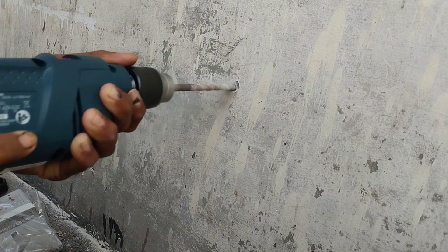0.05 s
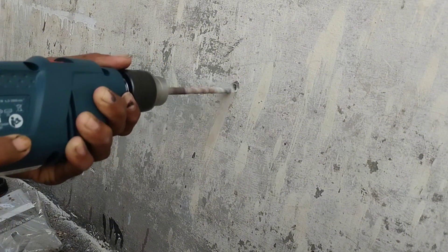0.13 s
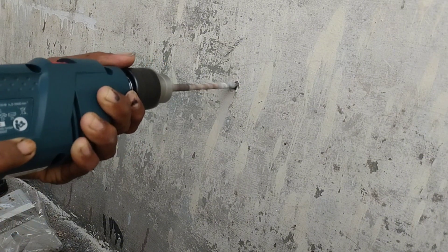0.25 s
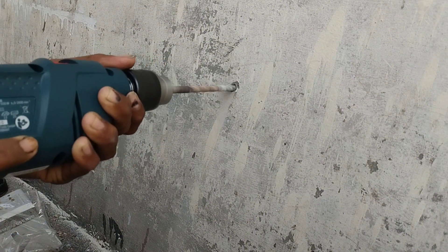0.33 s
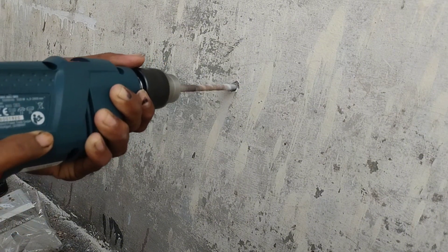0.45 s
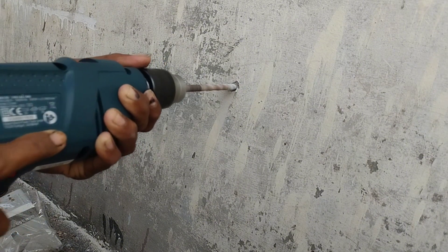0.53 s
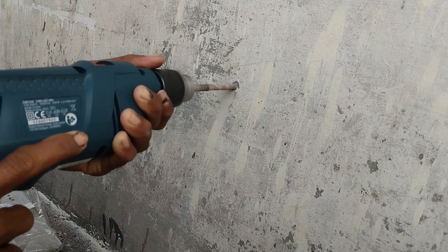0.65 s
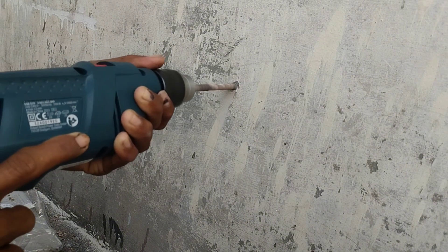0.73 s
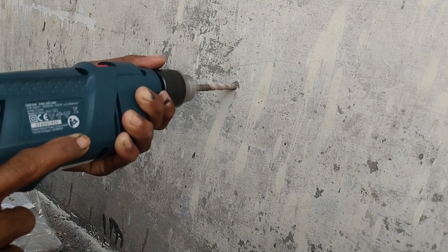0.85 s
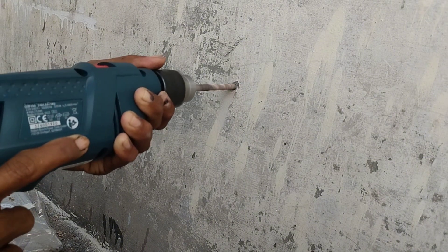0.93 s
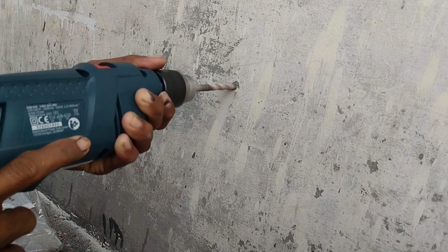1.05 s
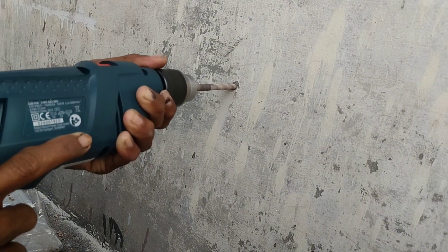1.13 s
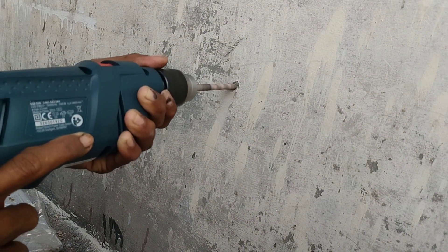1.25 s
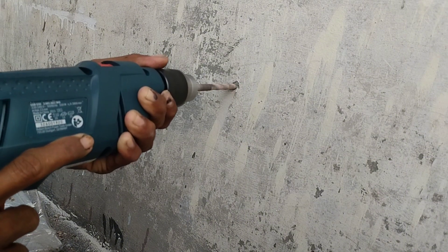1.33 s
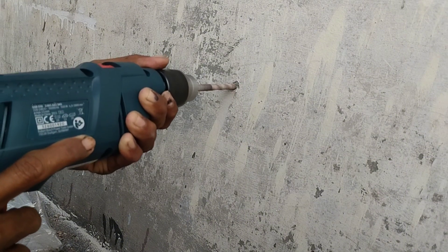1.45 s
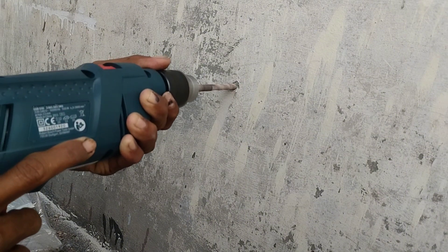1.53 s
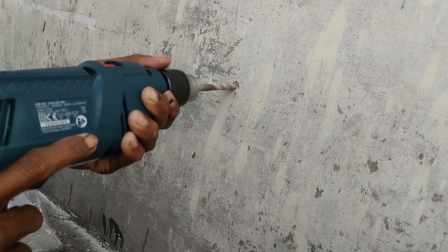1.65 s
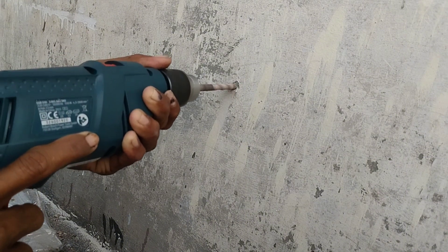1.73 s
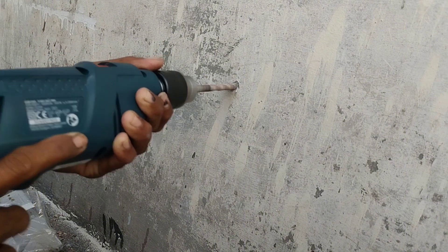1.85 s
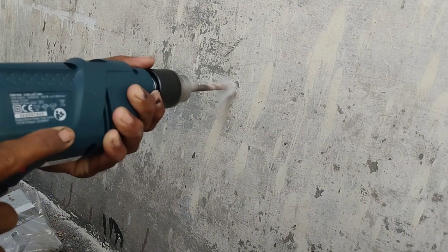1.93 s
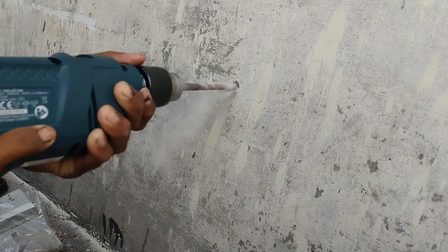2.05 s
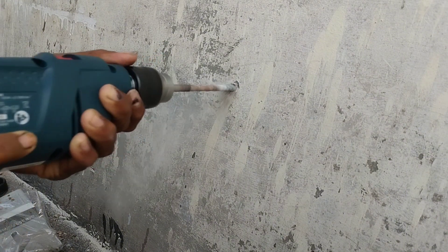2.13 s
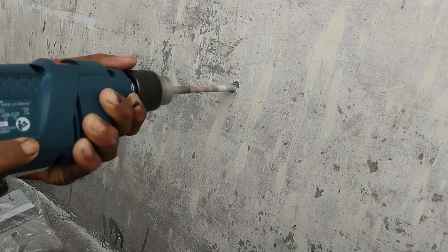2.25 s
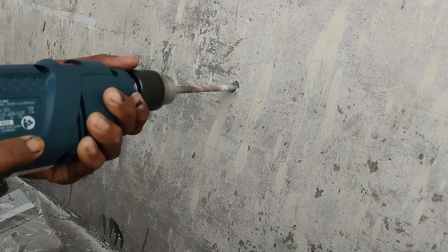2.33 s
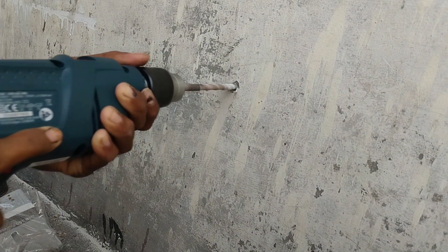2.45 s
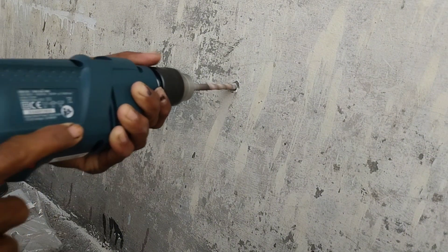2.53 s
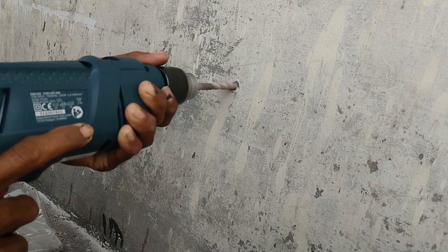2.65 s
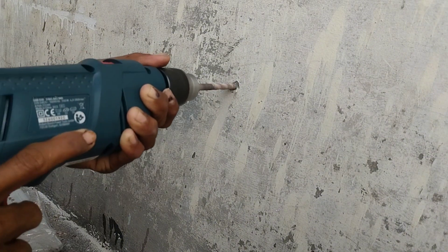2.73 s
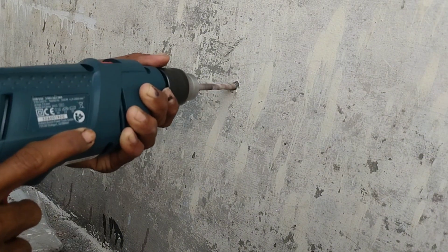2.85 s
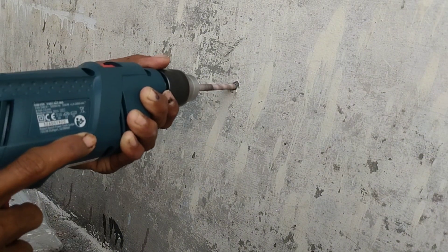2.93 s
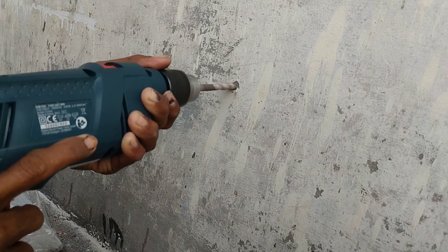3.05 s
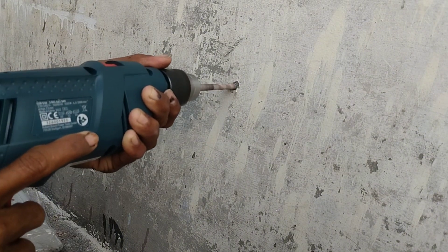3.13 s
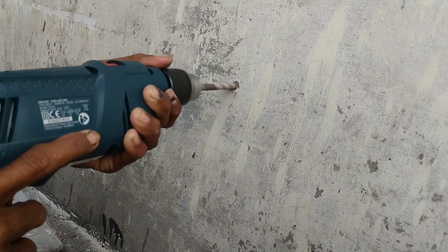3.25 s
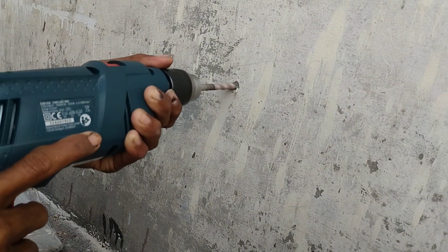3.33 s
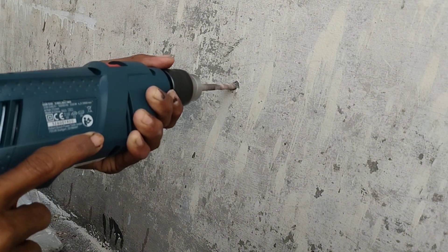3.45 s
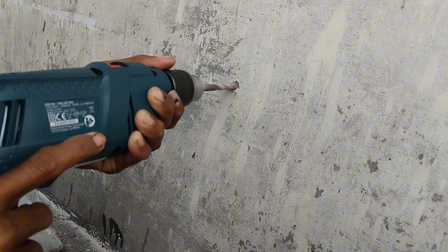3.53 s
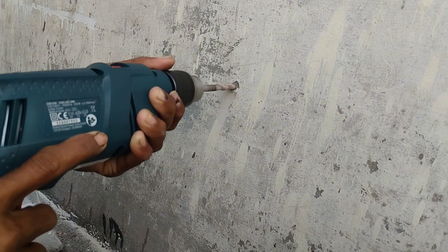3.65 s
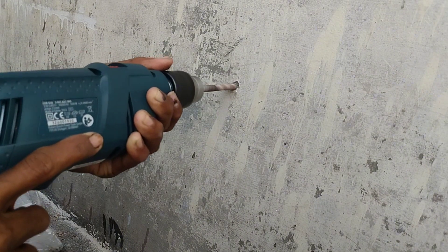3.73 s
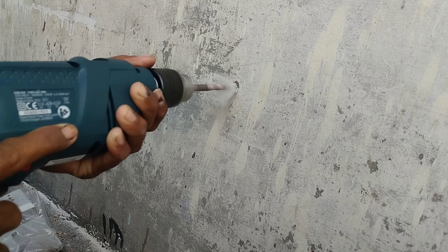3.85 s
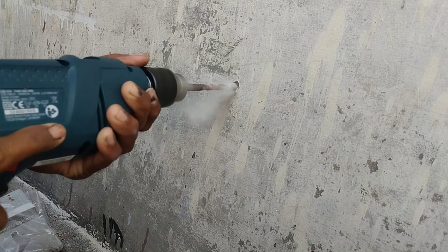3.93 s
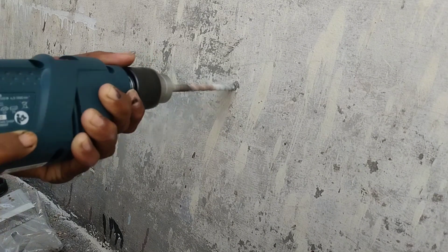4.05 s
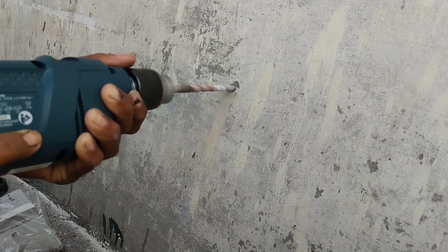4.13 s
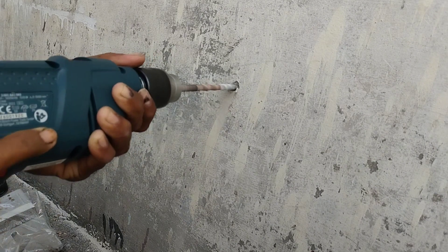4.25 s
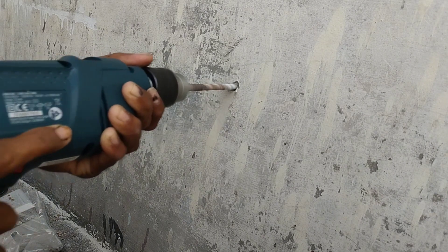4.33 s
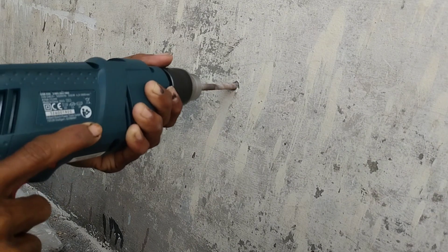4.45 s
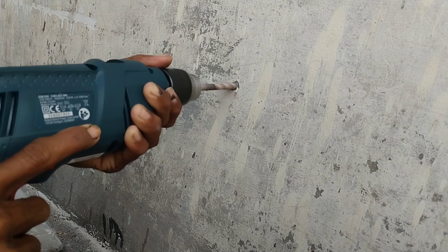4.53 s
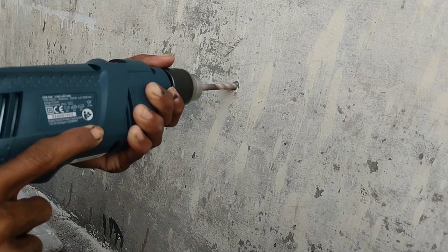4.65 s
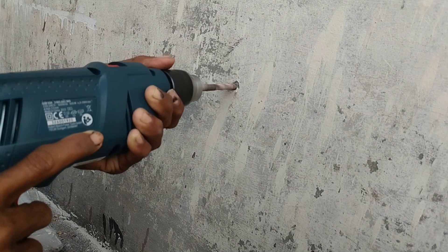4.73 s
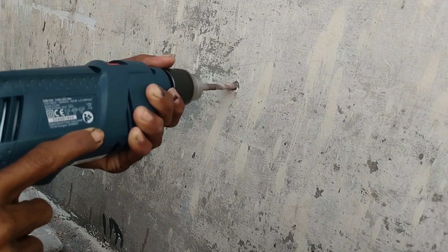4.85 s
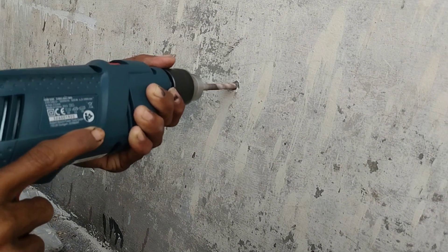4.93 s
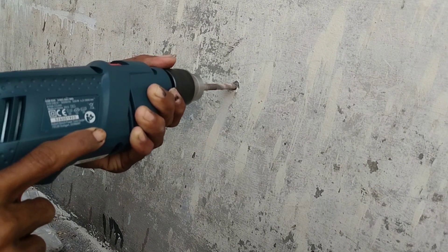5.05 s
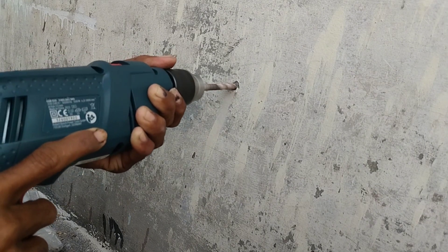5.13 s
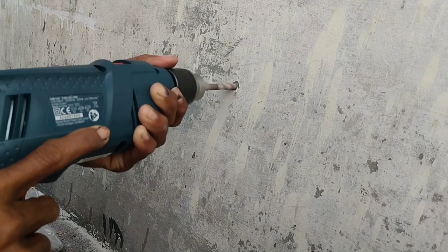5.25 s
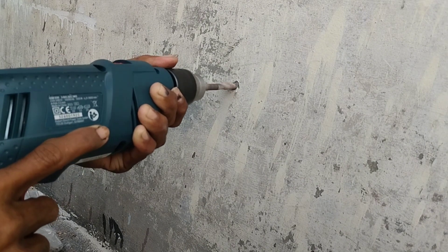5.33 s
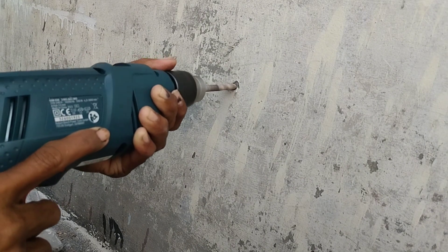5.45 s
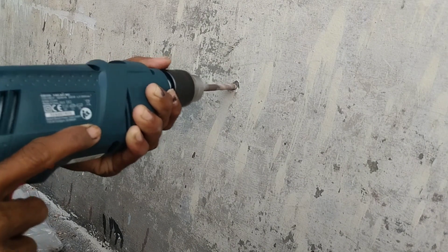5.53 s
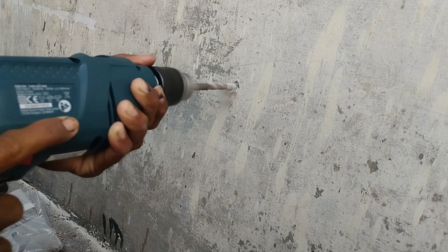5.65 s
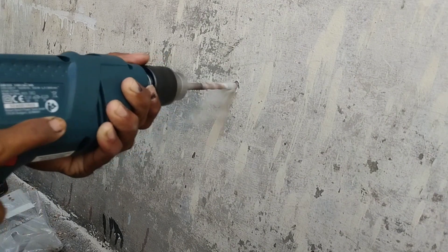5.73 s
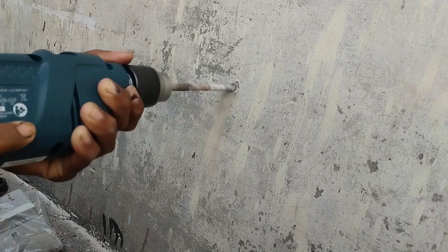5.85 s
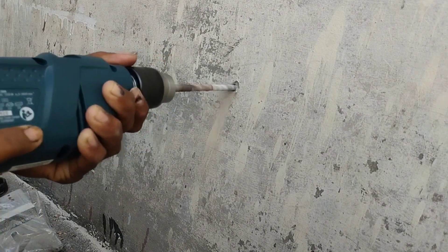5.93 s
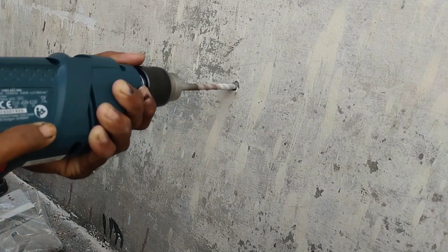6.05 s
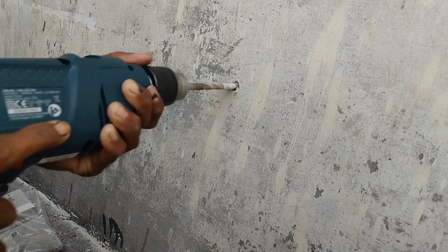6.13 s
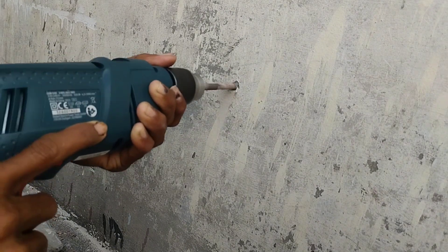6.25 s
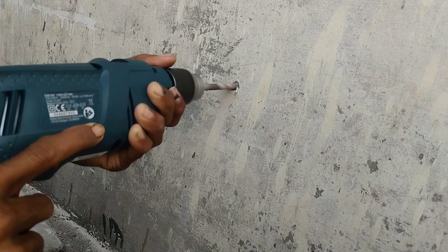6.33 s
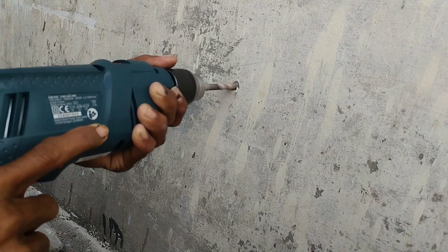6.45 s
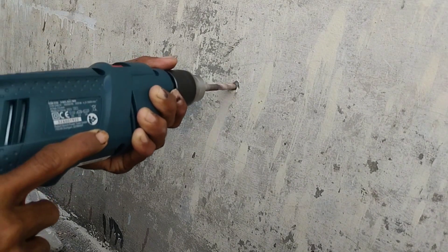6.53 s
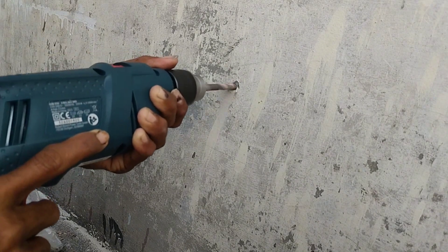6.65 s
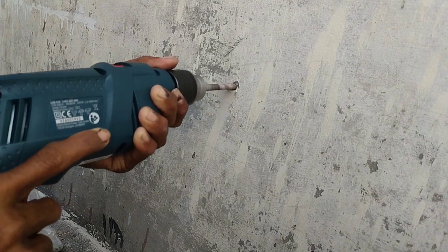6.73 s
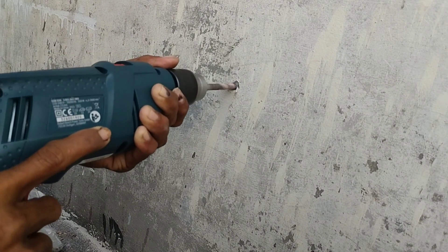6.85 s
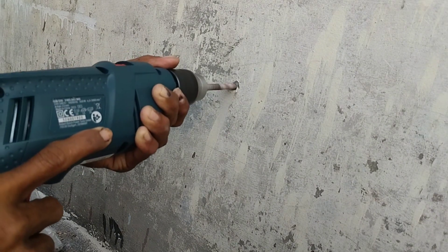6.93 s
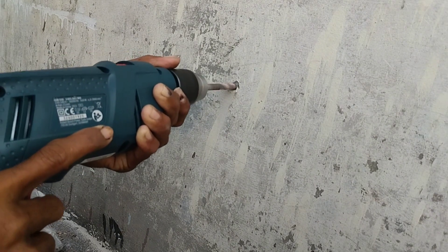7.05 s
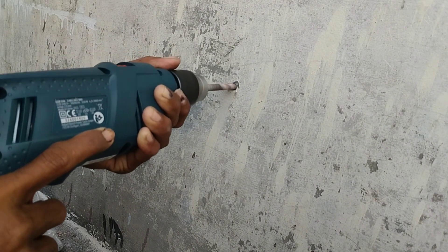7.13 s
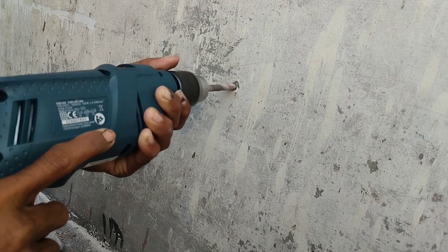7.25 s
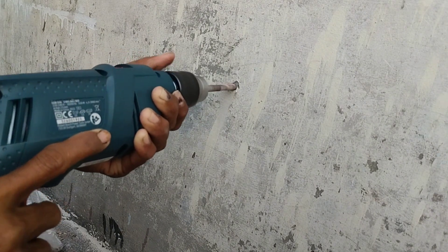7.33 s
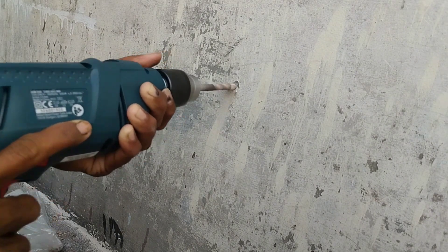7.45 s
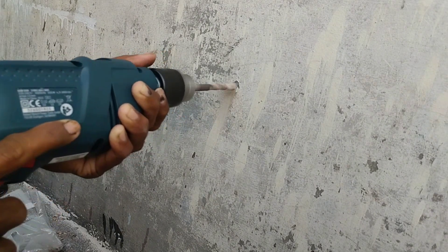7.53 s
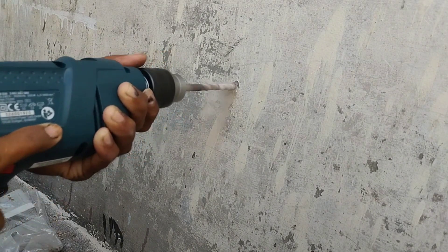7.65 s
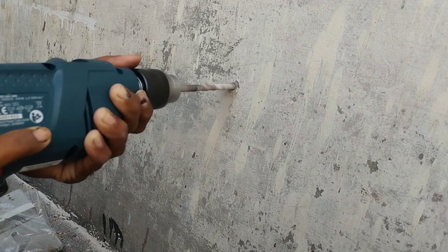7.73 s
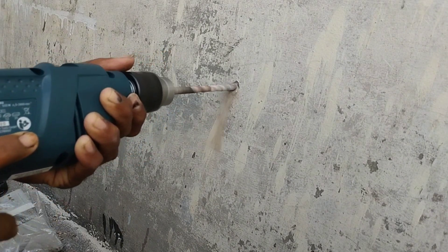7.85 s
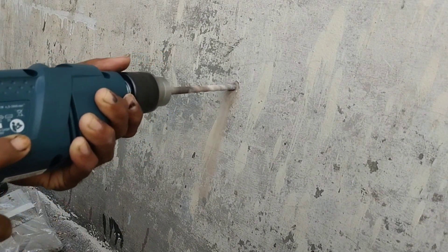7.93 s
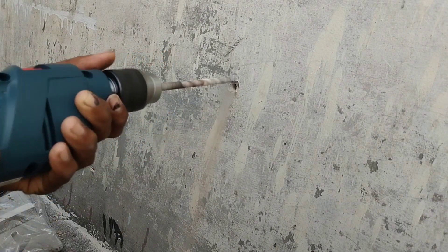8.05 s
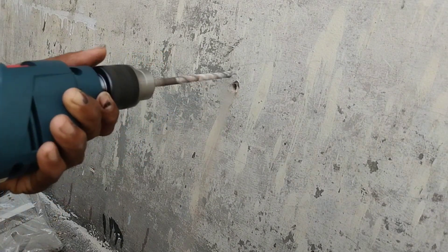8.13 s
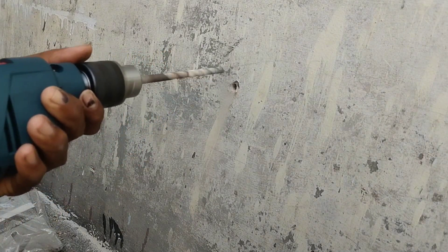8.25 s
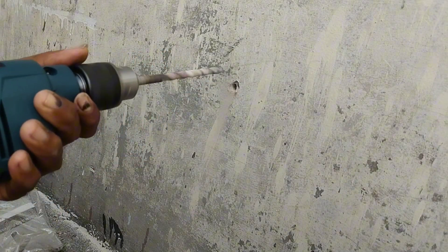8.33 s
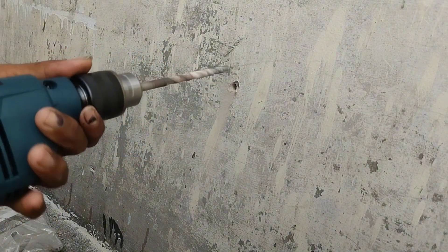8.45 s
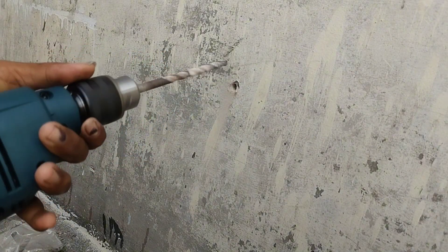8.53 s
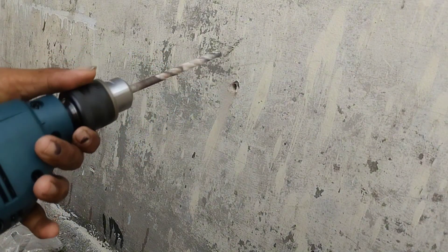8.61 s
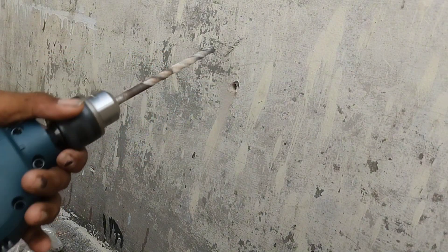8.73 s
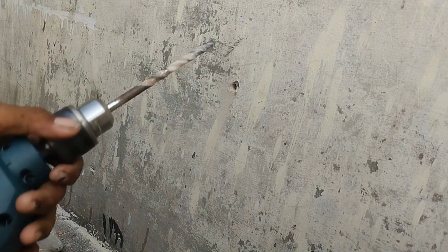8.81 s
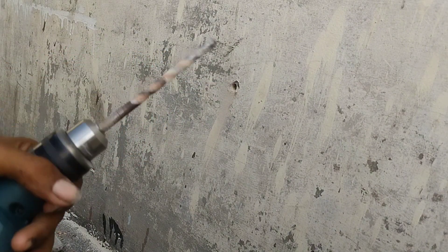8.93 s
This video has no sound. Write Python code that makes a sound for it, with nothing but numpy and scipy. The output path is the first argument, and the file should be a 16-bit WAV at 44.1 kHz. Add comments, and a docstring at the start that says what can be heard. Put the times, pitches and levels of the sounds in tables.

```python
"""In a bare room a corded hammer drill is pushed into a concrete wall four times, close to the microphone.
One changing motor speed drives everything: fan whine, gear whirr and the ratchet that hammers the bit.
Each push drags the motor down; blows are filtered clicks, and crushed stone is filtered noise.
Between pushes the bit squeaks out of the hole and the loose gearbox rattles; at last the motor coasts down.
Filtered noise adds puffs of cooling air, and the bare walls return a short tail."""
import sys
import numpy as np
from scipy import signal
from scipy.fft import rfft, irfft, next_fast_len
from scipy.io import wavfile
from scipy.ndimage import map_coordinates

SR = 44100
rng = np.random.default_rng(int(sys.argv[2]) if len(sys.argv) > 2 else 0)


def bounce(signal):
    """Save signal as a 16-bit WAV file at the path given by the first command-line argument."""
    frames = np.transpose(np.atleast_2d(signal))
    limited = np.clip(frames, -1, 1)
    pcm = np.round(limited * 32767).astype(np.int16)
    wavfile.write(sys.argv[1], SR, pcm)


N = 396018  # samples, about 9 s
TIME = np.arange(N) / SR  # s

# the drill is pushed into the wall: touch_s, weight_on_s, weight_off_s, lift_s, drag_turns_per_s,
# force_db, eased_db (change in force as the weight comes off), crunch_db (relative to the force),
# low_ring_hz, high_ring_hz (two rings of the bit)
PUSHES = [(0.645, 0.734, 1.754, 1.84, 122.7, -10, -6, -5, 1720, 3970),
          (2.605, 2.663, 3.625, 3.716, 128.5, -10.5, -6, -4.5, 2160, 3980),
          (4.464, 4.53, 5.439, 5.516, 129.5, -11, -5.5, -5.5, 2200, 4340),
          (6.269, 6.309, 7.24, 7.29, 121.7, -11, -2.5, -5, 2220, 4390)]
# the bit is drawn back and binds in the hole: start_s, end_s, drag_turns_per_s
PULLS = [(-0.15, 0.075, 135), (1.841, 2.148, 144), (3.71, 4.065, 130), (5.483, 5.829, 131),
         (7.32, 7.79, 117.7)]
# the bit rubs the side of the hole: start_s, length_s, first_hz, middle_hz, last_hz, level_db
SQUEAKS = [(1.738, .007, 9200, 9500, 9700, -12), (1.811, 0.04, 7830, 9240, 7650, -13.5),
           (1.85, 0.03, 8700, 9200, 8800, -10), (1.876, 0.0095, 9400, 8050, 8400, -16),
           (1.921, 0.012, 9350, 7800, 8000, -17.5), (1.961, 0.0031, 9100, 8600, 8200, -13.5),
           (3.682, 0.0061, 4930, 5100, 5100, -11), (3.702, 0.0082, 4970, 5130, 5040, -11),
           (3.733, 0.017, 6650, 6750, 6840, -16), (3.761, 0.018, 8000, 9500, 9200, -10.5),
           (3.783, 0.017, 7100, 9700, 9200, -14.5), (3.836, 0.011, 9200, 8000, 8200, -13),
           (5.44, 0.0065, 5300, 5430, 5500, -16), (5.531, 0.0071, 5550, 5240, 5700, -17),
           (5.652, 0.0043, 9300, 9050, 8650, -18), (7.301, .009, 10400, 10200, 10800, -11),
           (7.313, 0.0067, 5260, 5050, 5250, -8), (7.319, 0.018, 10740, 10700, 10100, -9),
           (7.337, 0.016, 10400, 10250, 9600, -10), (7.348, 0.035, 9600, 8100, 8350, -14),
           (7.376, 0.026, 10200, 10100, 10200, -15), (7.393, 0.024, 7500, 7300, 7800, -14),
           (7.405, 0.039, 9700, 8380, 8650, -9.5), (7.439, 0.0096, 8400, 9100, 9700, -9.5)]
# the binding bit holds the gears tight and the rattle drops: start_s, end_s, change_db
HUSHES = [(1.828, 1.966, -11), (1.94, 2.027, -7), (3.728, 3.902, -4), (5.496, 5.579, -6.5),
          (7.32, 7.54, -6.5)]
# the pinion whirrs louder for a moment, at lift-off, on speeding up or near top speed:
# start_s, end_s, gain_db
WHIRRS = [(0.05, 0.103, 9.5), (1.831, 1.88, 10), (2.102, 2.175, 9), (2.54, 2.632, 7), (3.7, 3.785, 6.5),
          (4.0, 4.095, 8.5), (4.275, 4.463, 7.5), (5.777, 5.864, 11), (6.05, 6.295, 8), (7.327, 7.467, 5.5),
          (7.665, 7.845, 11)]
# air from the vents buffets the microphone: middle_s, length_s, level_db
GUSTS = [(1.865, 0.038, -39.5), (2.325, 0.087, -37), (4.27, 0.05, -32), (4.42, 0.11, -18),
         (4.877, 0.07, -36), (5.156, 0.16, -30), (5.426, 0.065, -26.5), (5.61, 0.25, -28.5),
         (5.85, 0.06, -33), (6.55, 0.055, -34), (6.918, 0.08, -28), (8.003, 0.12, -29)]

# colours of the sounds, all as: frequency_hz, level_db
BLOW_COLOUR = [(150, -20.5), (390, -5), (470, -4.5), (560, -10.5), (800, -4), (1040, -0.5), (1170, 0.5),
               (1620, 0), (2050, -2), (2600, -4), (3100, -5.5), (4200, -4), (7000, -9.5), (15000, -31.5)]  # ratchet blows
CRUSH_COLOUR = [(100, -58), (300, -36), (520, -11), (750, -2.5), (1100, 2.5), (1500, 0), (2200, 4),
                (2700, 0.5), (4300, 0), (6000, -2.5), (7300, -5), (11000, -5.5), (12000, -10),
                (14500, -16.5)]  # stone being crushed
GEARBOX_COLOUR = [(100, -23), (280, -16), (520, -12), (800, -6.5), (1080, 0.5), (1400, 0), (1750, -5),
                  (2300, -6.5), (2850, -5), (3400, -6), (4800, -7.5), (6800, -10.5), (8400, -6.5),
                  (11000, -14)]  # clattering gear teeth
KNOCK_COLOUR = [(300, -35), (700, -4), (1060, 2.5), (1350, -7), (1650, -37), (1950, 3), (2400, -25),
                (5000, -36), (12000, -41)]  # chuck knocking against the pinion
HISS_COLOUR = [(2000, -18.5), (5000, 9.5), (8000, 10), (11000, 0.5), (13000, -2), (15500, -13)]  # brushes and air
AIR_COLOUR = [(15, -5.5), (42, -1), (80, -3), (150, -14), (230, -20), (500, -41), (2000, -70)]  # steady cooling air
GUST_COLOUR = [(20, 0), (45, -3), (90, -4), (150, -8.5), (215, -13.5), (300, -36), (600, -44), (2000, -70)]  # stronger gusts
# how loudly the housing gives out each tone as its pitch moves: pitch_hz, level_db
FAN_VOICE = [(2200, -44), (3650, -40), (3950, -34), (4600, -30.5), (4900, -25.5), (5200, -25.5),
             (5500, -19), (5800, -13), (6050, -15), (6400, -15)]
PINION_VOICE = [(510, -44), (620, -37.5), (790, -25), (900, -33), (1130, -24), (1240, -25.5), (1350, -30),
                (1430, -26.5), (1500, -19)]

# peaks in the colour of the crunch, the last a thin hiss near 15 kHz: centre_hz, width_hz, level_db
CRUNCH_PEAKS = [(3070, 125, 3), (3700, 190, -2), (5210, 88, -1.5), (5880, 140, -3.5), (8520, 450, -4.5),
                (9290, 78, 3), (10200, 270, -10.5), (15280, 290, 11)]
# resonances of the gear housing: centre_hz, width_hz, level_db
HOUSING = [(1064, 135, -4.5), (1810, 130, -0.5), (3000, 100, -13), (4670, 250, -7), (8150, 110, -6),
           (11300, 500, -5)]
# lesser motor tones: multiple of the motor speed, level_db,
# best_speed_turns_per_s (the housing sings along most), width_turns_per_s (of that swell)
OVERTONES = [(1, -40.5, 365, 30), (5, -24, 185, 30), (6, -28, 180, 27), (8, -30, 343, 82),
             (8, -26.5, 131, 16), (12, -29, 284, 37), (24, -35.5, 310, 180), (34, -28.5, 291, 73),
             (48, -48, 120, 98)]

BLADES, PINION_TEETH, WHEEL_TEETH, RATCHET_TEETH = 17, 4, 44, 16
# motor speeds in turns per s: running free, and at the start
FREE_SPEED, FIRST_SPEED = 384.3, 272.1
INERTIA_S = 0.257  # how slowly the motor follows its load
LEAN_S, EASE_S = 0.157, 0.24  # time for the weight to come on and off
# power off: the first loss of speed (turns per s, each s) and the share of it that fades each s
POWER_OFF_S, BRAKING, BRAKING_FADE = 7.81, 193.3, 0.28
TOP_SPEED = 365  # turns per s; reference for the sounds that grow with speed
SLACK_START_S, SLACK_END_S = 7.84, 8.42  # the coasting gears lose contact and knock


def amp(db):
    """Turns decibels into a gain."""
    return 10 ** (np.asarray(db) / 20)


def unit(x):
    """Scales a sound to rms 1."""
    return x / np.sqrt(np.mean(x ** 2) + 1e-20)


def between(start, end, rise_s=0.0082, fall_s=0.021):
    """A gate that starts to rise at start and is shut again at end."""
    return np.clip((TIME - start) / rise_s, 0, 1) * np.clip((end - TIME) / fall_s, 0, 1)


def ramp(middle, length):
    """Rises from 0 to 1 in length seconds."""
    return np.clip((TIME - middle) / length + 0.5, 0, 1)


def arch(start, end):
    """A parabola of height 1 between two times."""
    return np.maximum(4 * (TIME - start) * (end - TIME) / (end - start) ** 2, 0)


def read(points, hz):
    """Reads a level in dB, joined by straight lines on a log-frequency axis."""
    f, db = np.transpose(points)
    return np.interp(np.log(hz), np.log(f), db)


def colour(x, spectrum, rings=()):
    """Filters a sound with a spectrum and a few resonances, without sounding ahead of time."""
    size = next_fast_len(N + 8192)
    hz = abs(np.fft.fftfreq(size, 1 / SR))
    f, db = np.transpose(spectrum)
    gain = amp(np.interp(np.log(hz + 1), np.log(f), db))
    for centre, width, ring_db in rings:
        gain = gain * (1 + amp(ring_db) / (1 + (2 * (hz - centre) / width) ** 2))
    # minimum phase: the response follows from the gain alone
    response = np.exp(np.conj(signal.hilbert(np.log(gain))))
    return irfft(rfft(x, size) * response[:size // 2 + 1], size)[:N]


def wander(hz):
    """Smooth chance of rms 1, up to about hz."""
    at = TIME * hz * 2
    return unit(map_coordinates(rng.standard_normal(16384), [at], order=1, mode="grid-wrap"))


def worn(turns, size):
    """Uneven metal: one random pattern that comes round again on every turn."""
    pattern = rng.standard_normal(size)
    return unit(map_coordinates(pattern, [turns % 1 * size], order=3, mode="grid-wrap"))


def clicks(cycles):
    """One sharp impulse at each whole number of cycles, placed between samples where needed."""
    at = np.flatnonzero(np.diff(np.floor(cycles)) > 0)
    late = (np.ceil(cycles[at]) - cycles[at]) / (cycles[at + 1] - cycles[at])
    taps = np.arange(-6, 8)
    out = np.zeros(N)
    np.add.at(out, np.clip(at[:, None] + taps, 0, N - 1), np.sinc(taps - late[:, None]))
    return out


def ratchet_blows(chuck):
    """Ratchet teeth knock the bit into the stone; the off-centre chuck makes them swing."""
    angle = 2 * np.pi * chuck
    # timing errors, in teeth
    teeth = RATCHET_TEETH * chuck + 0.038 * np.sin(angle) + 0.014 * np.sin(2 * angle)
    teeth += 0.0084 * worn(chuck, size=16) + 0.0055 * wander(150)
    hardness = amp(3.0 * wander(11))  # the tip meets pebbles and soft cement
    swing = 1 + 0.19 * (np.cos(angle) + np.cos(2 * angle))  # once and twice a turn
    return teeth, unit(colour(clicks(teeth) * hardness * swing, BLOW_COLOUR))


def crushed_stone(chuck, teeth):
    """Each blow crushes stone and sets the steel chattering, partly alike from turn to turn."""
    angle = 2 * np.pi * chuck
    grit = rng.standard_normal(N) + worn(chuck, size=1024)
    chip_db = 2 * rng.standard_normal(8192)[teeth.astype(int) % 8192]  # each blow differs
    burst = amp(chip_db) * np.exp(-(teeth % 1) / 0.48)  # dies down towards the next tooth
    grit = unit(colour(grit * (0.87 + burst), CRUSH_COLOUR, CRUNCH_PEAKS))
    treble = signal.sosfilt(signal.butter(3, 5700, "high", fs=SR, output="sos"), grit)
    chatter = signal.sosfilt(signal.butter(3, 5700, "low", fs=SR, output="sos"), grit)
    # the two cutting edges bite in turn
    throb_db = 1.8 * np.cos(2 * angle) + 1.6 * np.cos(angle + 1) + 0.54 * wander(25)
    return chatter, unit(treble * amp(throb_db))


def hammer(motor):
    """Blows, chatter and crunch follow the pressure of each push, and the bit rings with them."""
    settle_s, fresh_db, fresh_crunch_db = 0.59, -1.5, 2.5  # the tip beds in
    ease_lead_s, eased_crunch_db = 0.11, 5  # as the weight comes off, the tip scrapes more
    jolt_db, jolt_s = 7.5, 0.018  # the first contact
    ring_out_s = 0.022  # the chatter outlasts the last blow
    chuck = motor * PINION_TEETH / WHEEL_TEETH
    teeth, blows = ratchet_blows(chuck)
    chatter, crunch = crushed_stone(chuck, teeth)
    out = np.zeros(N)
    for touch, _, _, lift, _, db, eased_db, tip_db, low_hz, high_hz in PUSHES:
        age = np.maximum(TIME - touch, 0)
        fresh = np.maximum(1 - age / settle_s, 0)
        eased = ramp(lift - ease_lead_s, EASE_S)
        force_db = db + fresh_db * fresh + eased_db * eased + jolt_db * np.exp(-age / jolt_s)
        crunch_db = tip_db + fresh_crunch_db * fresh + eased_crunch_db * eased
        # clean blows need full pressure; a light touch only scrapes
        firmness = amp(-8 * eased - 3 * fresh) * between(touch, lift, fall_s=0.048)
        body = chatter + amp(2.2) * firmness * blows
        low_ring = amp(-3) * signal.lfilter(*signal.iirpeak(low_hz, 8, SR), body)
        high_ring = amp(-1) * signal.lfilter(*signal.iirpeak(high_hz, 13, SR), body)
        stroke = amp(-4.0) * (body + low_ring + high_ring) + amp(crunch_db + 1) * crunch
        out += between(touch, lift + ring_out_s, fall_s=0.027) * amp(force_db) * stroke
    return out


def motor_speed():
    """Turns per second: the motor lags behind its load, and coasts down once the power is off."""
    drag = np.zeros(N)
    for _, weight_on, weight_off, _, loss, *_ in PUSHES:
        drag += loss * ramp(weight_on, LEAN_S) * (1 - ramp(weight_off, EASE_S))
    for start, end, loss in PULLS:
        drag += loss * arch(start, end)
    keep = np.exp(-1 / (INERTIA_S * SR))  # share of the old speed kept at each sample
    powered = FIRST_SPEED + signal.lfilter([1 - keep], [1, -keep], FREE_SPEED - drag - FIRST_SPEED)
    held = np.interp(np.minimum(TIME, POWER_OFF_S), TIME, powered)
    coast_s = np.maximum(TIME - POWER_OFF_S, 0)
    return held - BRAKING * coast_s * (1 - BRAKING_FADE * coast_s / 2)


def gearbox(motor, speed):
    """Unloaded teeth clatter in their backlash; with the power off, the pattern of each turn stands out."""
    octaves = np.log2(speed / TOP_SPEED)
    # dB at top speed, dB per doubling of speed, and a least level in dB
    rattle_gain = np.hypot(amp(-15.5 + 15.5 * octaves), amp(-30.5))
    hiss_gain = np.hypot(amp(-17 + 21.5 * octaves), amp(-52))
    # strength of the part that repeats each turn: under power, then coasting
    regular = np.interp(TIME, [POWER_OFF_S, POWER_OFF_S + 0.57], [0.06, 0.17])
    knocks = rng.standard_normal(N) * amp(2.0 * wander(170) + 2 * np.cos(2 * np.pi * motor))
    clatter = unit(knocks) + regular * worn(motor, size=32)
    rattle = unit(colour(clatter, GEARBOX_COLOUR, HOUSING))
    hiss = unit(colour(rng.standard_normal(N) * amp(0.67 * wander(220)), HISS_COLOUR))
    return rattle_gain * rattle + hiss_gain * hiss


def rasp(motor, speed):
    """Near full speed the gear teeth rasp against each other in rough bursts."""
    level_db = -22 + 32 * np.log2(speed / TOP_SPEED)  # 32 dB per doubling of speed
    bursts = rng.standard_normal(N) * amp(4 * wander(120) + 3 * np.cos(2 * np.pi * motor))
    band = signal.iirpeak(2650, 4.0, SR)  # centre Hz, sharpness
    narrowed = signal.lfilter(*band, signal.lfilter(*band, bursts))
    return amp(level_db) * unit(narrowed)


def hush():
    """The dB by which the gears quieten while the binding bit holds them tight; they break loose at once."""
    return sum(db * between(start, end, rise_s=0.04, fall_s=0.0032) for start, end, db in HUSHES)


def backlash(motor):
    """The heavy chuck overruns the motor and knocks against the pinion a few times a turn."""
    cycles = 3 * motor * PINION_TEETH / WHEEL_TEETH + 0.3 * wander(12)  # 3 knocks per chuck turn
    knocks = colour(clicks(cycles) * amp(3 * wander(60)), KNOCK_COLOUR, HOUSING)
    return amp(-26.5) * between(SLACK_START_S, SLACK_END_S, rise_s=0.055) * unit(knocks)


def tone(cycles, shake_db, blur):
    """A machine tone of rms 1 whose loudness and phase (blur, in radians) tremble."""
    return unit(amp(shake_db * wander(60)) * np.sin(2 * np.pi * cycles + blur * wander(70)))


def whine(motor, speed):
    """Fan blades and pinion teeth sing at multiples of the motor speed."""
    fan_gain = amp(read(FAN_VOICE, BLADES * speed))
    fan = fan_gain * tone(BLADES * motor, shake_db=1.54, blur=0.13)
    mesh = PINION_TEETH * motor
    mesh_db = read(PINION_VOICE, PINION_TEETH * speed)
    mesh_db += sum(db * between(start, end, rise_s=0.02) for start, end, db in WHIRRS)
    octave = tone(2 * mesh, shake_db=9, blur=0.18)
    pinion = tone(mesh, shake_db=3.0, blur=0.47) + amp(-17) * octave
    # the whirr stops while the gears are out of contact
    meshed = 1 - between(SLACK_START_S, SLACK_END_S, rise_s=0.085, fall_s=0.06)
    out = fan + amp(mesh_db) * pinion * meshed
    unpowered_db = -5 * ramp(POWER_OFF_S, 0.1)  # the lesser tones weaken once the current stops
    for multiple, db, best_speed, width in OVERTONES:
        swell = (1 + (2 * (speed - best_speed) / width) ** 2) ** -0.62
        out += amp(db + unpowered_db) * swell * tone(multiple * motor, shake_db=3.5, blur=0.52)
    return out


def squeaks():
    """Stick-slip squeals of steel on stone, with weaker partials at a half and three halves of the pitch."""
    out = np.zeros(N)
    waver_hz = 170 * wander(300)
    flutter = amp(3.8 * wander(200))
    for start, length, first, middle, last, db in SQUEAKS:
        at = round(start * SR) + np.arange(round(length * SR))
        age = np.linspace(0, 1, len(at))
        hz = np.interp(age, [0, 0.5, 1], [first, middle, last]) + waver_hz[at]
        half = np.pi * np.cumsum(hz) / SR  # phase at half the pitch
        squeal = np.sin(2 * half) + amp(-10) * np.sin(half) + amp(-26) * np.sin(3 * half)
        grab = np.minimum(age * 10, 1) * np.sqrt(1 - age)  # catches quickly, then lets go
        out[at] += amp(db) * unit(squeal * flutter[at] * grab)
    return out


def skidding():
    """As the pressure eases, the tip skids in a flurry of tiny chirps."""
    hz = 5150 + 380 * wander(37) + 110 * wander(400)
    phase = 2 * np.pi * np.cumsum(hz) / SR
    grip = np.maximum(wander(70), 0) ** 2
    easing = sum(between(lift - 0.26, lift, rise_s=0.1) for _, _, _, lift, *_ in PUSHES)
    return amp(-25) * easing * unit(grip * (np.sin(phase) + amp(-1) * np.sin(2 * phase)))


def draught(bogged):
    """Lumpy low puffs of cooling air: weak while the motor labours, stronger once the drill is drawn back."""
    withdrawn = ramp(7.2, 0.4)  # around 7.2 s the vents come to face the microphone
    steady = amp(-45 - 12 * bogged + 11 * withdrawn)
    flow = unit(colour(rng.standard_normal(N) * amp(3 * wander(13)), AIR_COLOUR))
    gusts = sum(amp(db - 1) * arch(middle - length / 2, middle + length / 2)
                for middle, length, db in GUSTS)
    return steady * flow + gusts * unit(colour(rng.standard_normal(N), GUST_COLOUR))


def room(x):
    """Bare walls return a short, dense tail."""
    t60 = 0.22  # s for the tail to fall by 60 dB
    t = np.arange(SR // 2) / SR
    tail = rng.standard_normal(len(t)) * amp(-60 * t / t60) * (t > 0.002)
    return x + amp(-14) * signal.fftconvolve(x, tail / np.linalg.norm(tail))[:N]


def scene():
    """One motor speed drives hammer, gears and whine; the room answers."""
    # load takes up the slack in the gears
    load = sum(between(touch, lift) for touch, _, _, lift, *_ in PUSHES)
    # the whine fades as the motor slows
    bogged = sum(between(touch, lift + 0.055, rise_s=0.35, fall_s=0.28)
                 for touch, _, _, lift, *_ in PUSHES)
    speed = motor_speed() + 0.704 * load * wander(12)  # uneven stone makes the motor stumble
    motor = np.cumsum(speed) / SR  # turns so far
    hush_db = hush()
    gears = amp(-12 * load + hush_db) * (gearbox(motor, speed) + rasp(motor, speed))
    tones = amp(-5 * bogged - 9 * load + 0.45 * hush_db) * whine(motor, speed)
    drill = hammer(motor) + gears + backlash(motor) + tones
    return (room(drill + skidding()) + squeaks() + draught(bogged))[None]


def record(dry):
    """The loudest peaks are rounded off; then everything above about 15.7 kHz is cut."""
    ceiling = 0.97
    fine = signal.resample_poly(dry, 2, 1, axis=1)  # double rate while rounding
    rounded = fine / (1 + (fine / ceiling) ** 8) ** (1 / 8)
    held = signal.resample_poly(rounded, 1, 2, axis=1)
    lowpass = signal.firwin(1023, 15720, window=("kaiser", 8), fs=SR)
    return signal.oaconvolve(held, lowpass[None], "same")


dry = scene()
out = record(dry)
bounce(out)
```